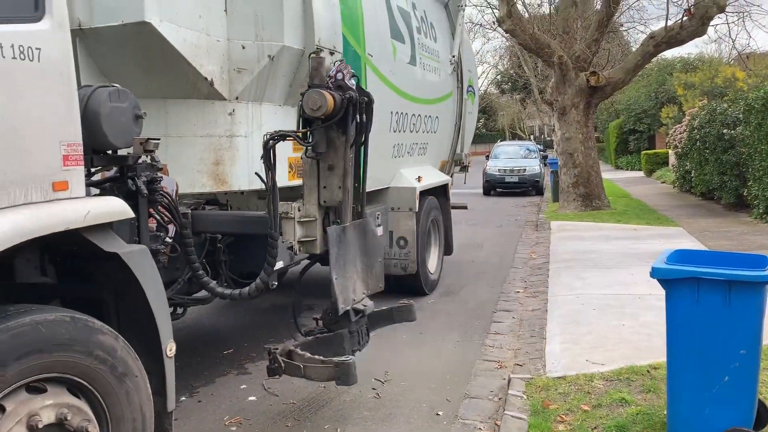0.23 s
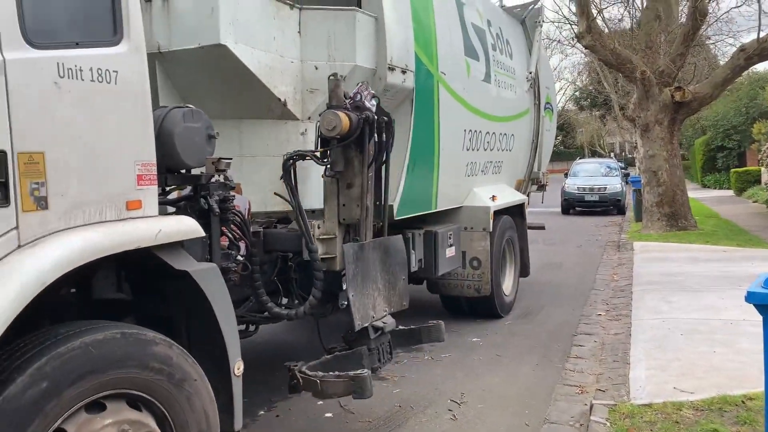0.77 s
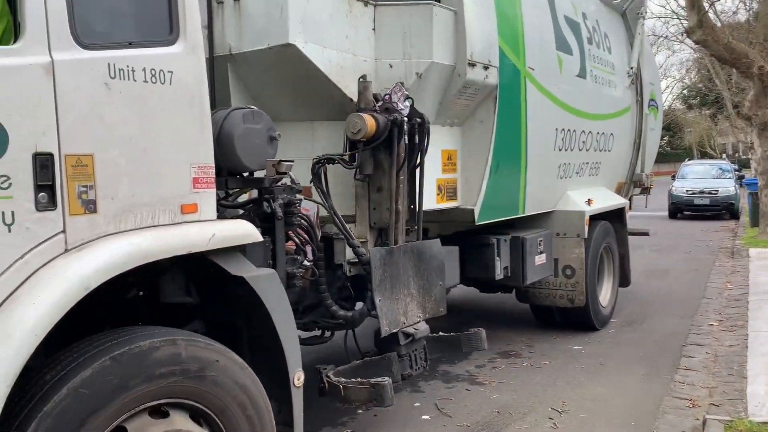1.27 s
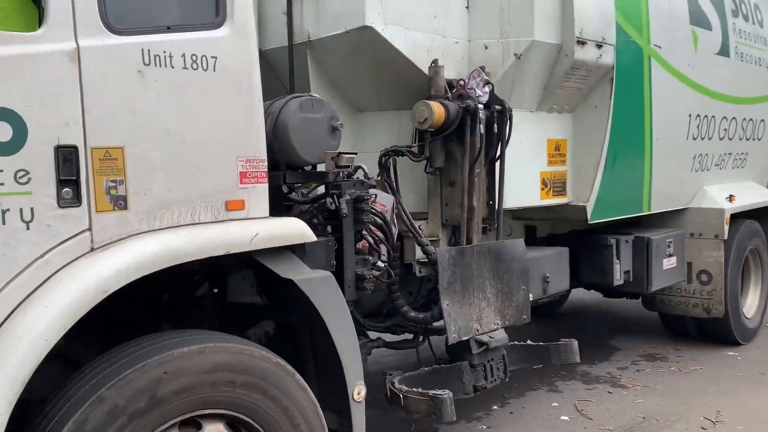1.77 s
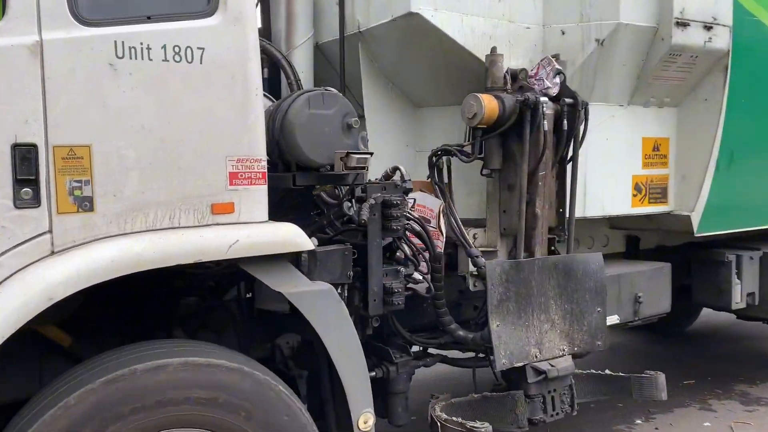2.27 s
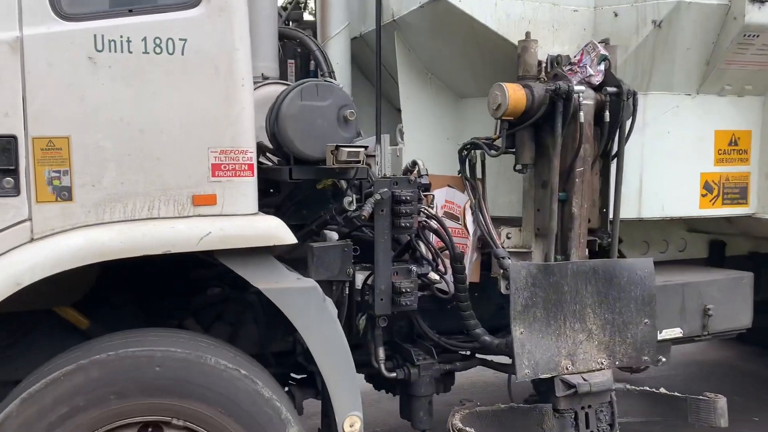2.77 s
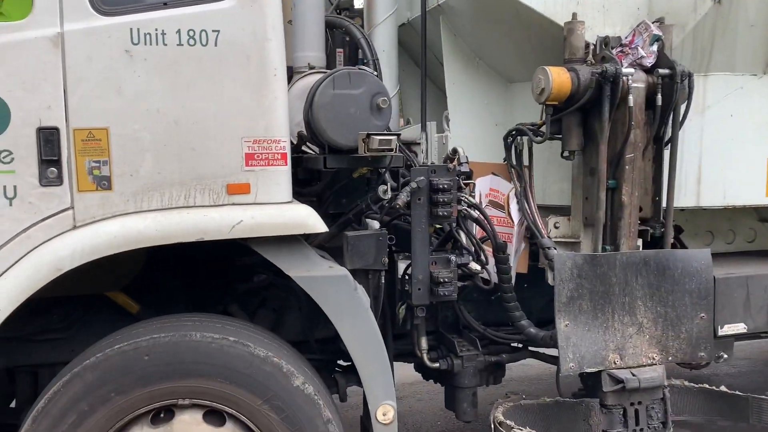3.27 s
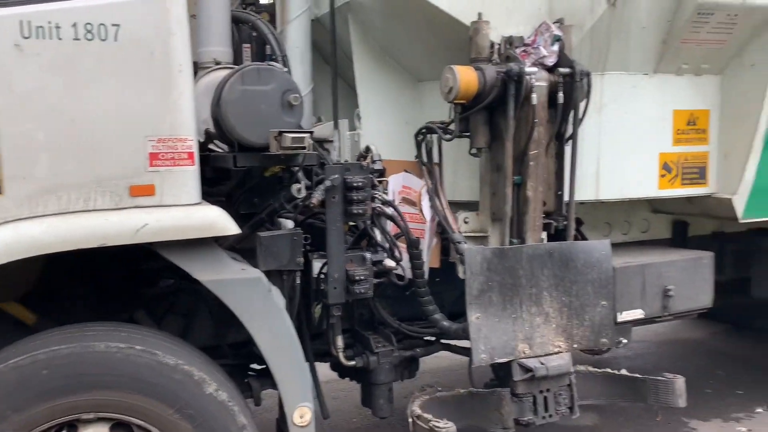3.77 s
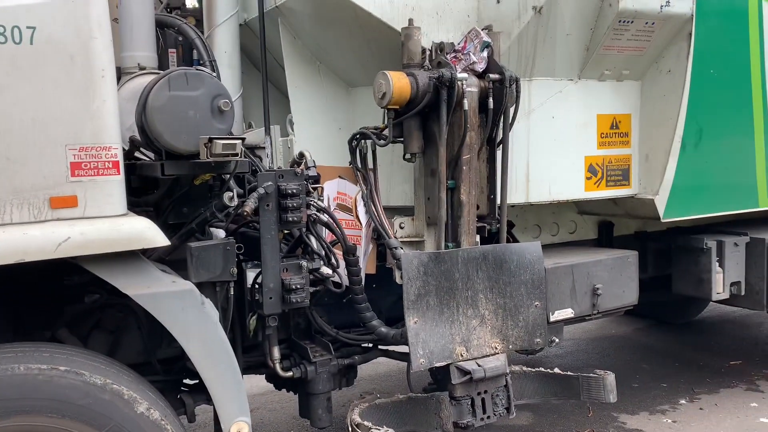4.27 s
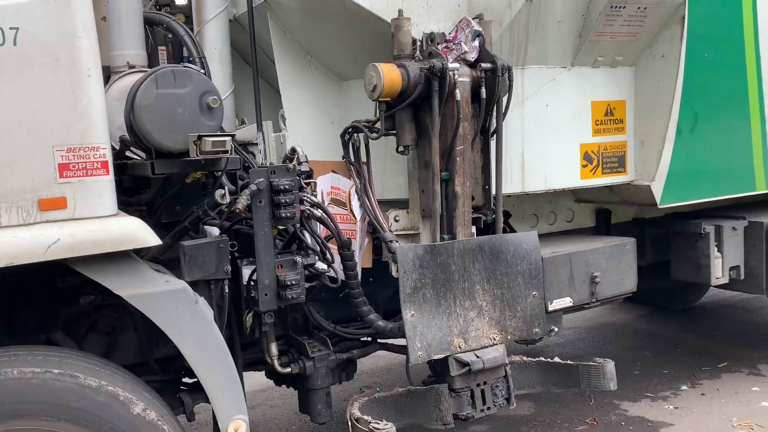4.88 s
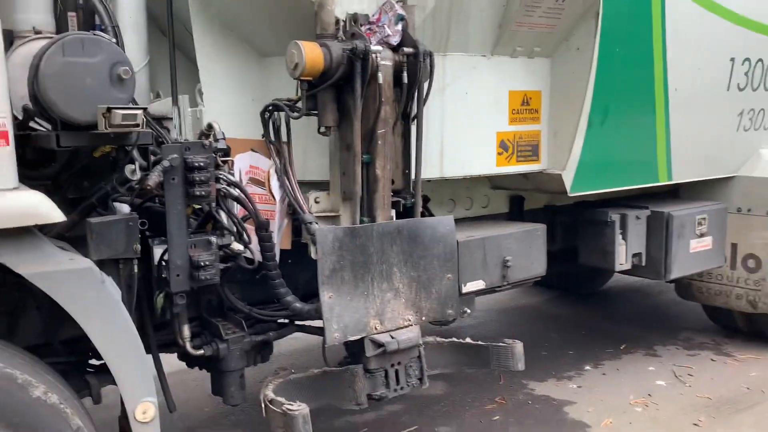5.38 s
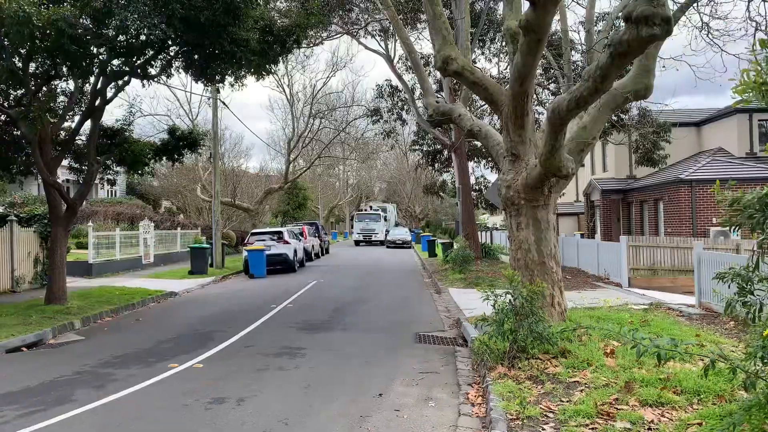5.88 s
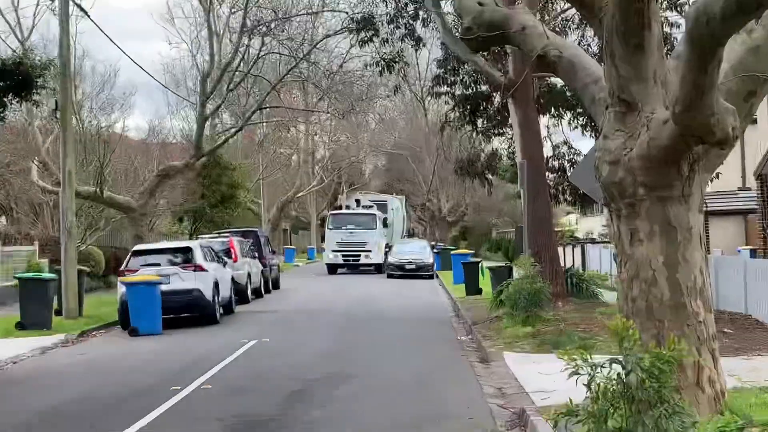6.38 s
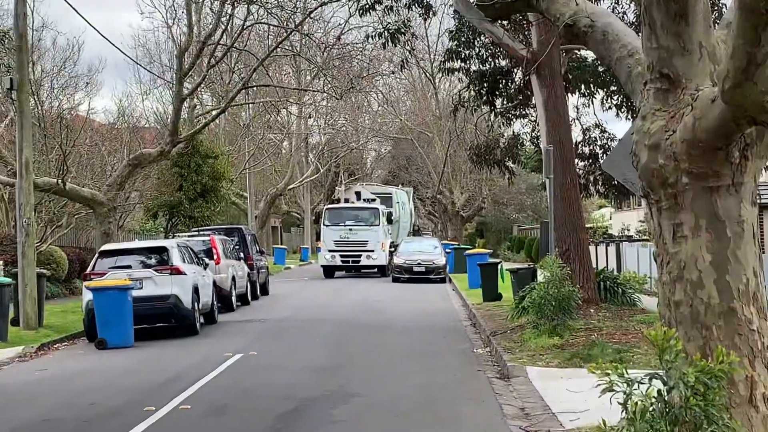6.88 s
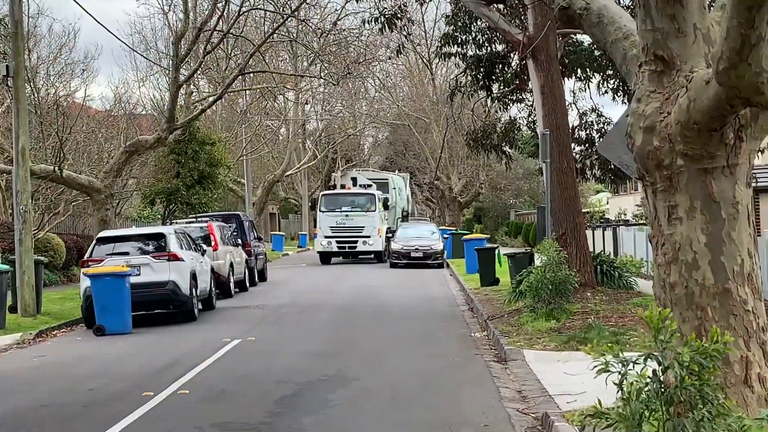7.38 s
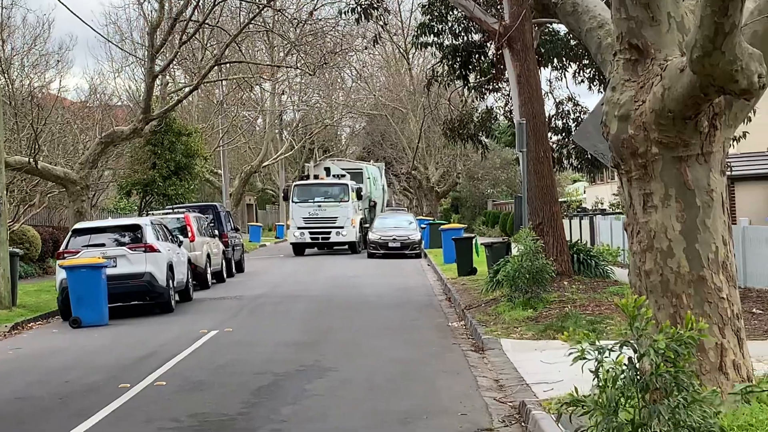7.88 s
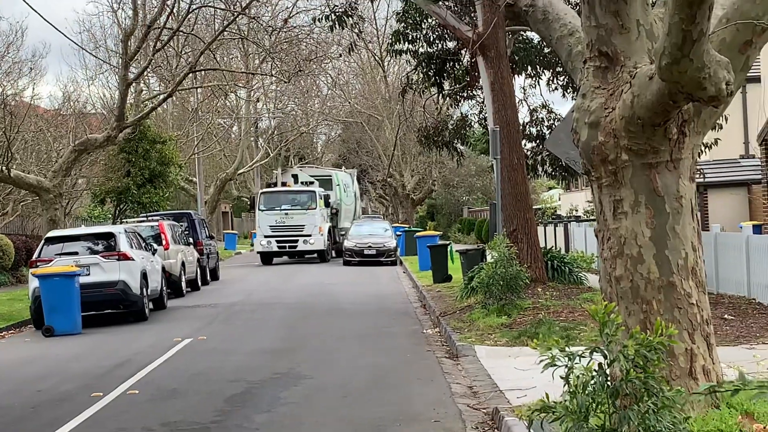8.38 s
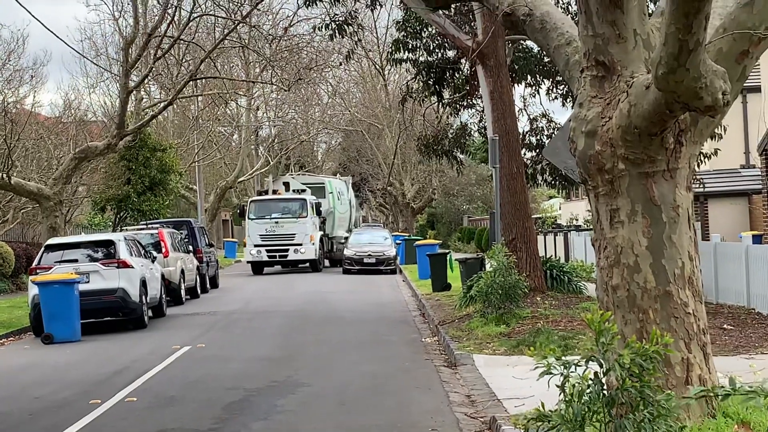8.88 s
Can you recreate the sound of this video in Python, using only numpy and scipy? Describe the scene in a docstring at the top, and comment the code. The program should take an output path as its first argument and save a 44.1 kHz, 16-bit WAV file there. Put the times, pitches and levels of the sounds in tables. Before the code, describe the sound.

A garbage truck's diesel engine rumbles and clatters close by on a suburban street. Its lifting arm clunks and rattles over a hydraulic hum, then the brakes give a very high, fluttering squeal, followed by a sharp blast of air. The sound cuts to a second truck far down the street, which idles, revs up, eases off and clunks dully. Heard in stereo with short street echoes.

```python
"""A garbage truck idles close by, rumbling and clattering as its cylinders fire. Its lifting arm clunks home,
ringing the steel, while the hydraulic pump hums. Then the brakes stick and slip in a squeal and blow
off a jet of air, and the engine noise dips under them. The scene switches to a second truck far down
the street, which idles, pulls away, eases off and clunks. Two closely spaced microphones hear it all."""
import sys
import numpy as np
from scipy import signal
from scipy.fft import rfft, irfft, next_fast_len
from scipy.io import wavfile
from scipy.ndimage import uniform_filter1d, map_coordinates

SR = 44100
rng = np.random.default_rng(int(sys.argv[2]) if len(sys.argv) > 2 else 0)


def wrap_up_sound(samples):
    """Save the sound to the file named by the first command line argument, as 16-bit audio."""
    columns = np.atleast_2d(samples).T
    # keep every value between -1 and 1, then stretch to whole-number steps
    tamed = np.clip(columns, -1, 1)
    steps = np.round(tamed * 32767).astype(np.int16)
    wavfile.write(sys.argv[1], SR, steps)


N = 402191
TIME = np.arange(N) / SR
SWITCH_S = 5.627  # the far truck takes over

# air releases, near truck then far: (valve opens [s], level [dB], stays open [s])
AIR_RELEASES = [(4.352, -12, 0.43), (6.765, -56, 0.12)]


def near_truck(clunks):
    """The close truck: engine, arm, pump and brakes, with short street echoes."""
    speed = [(0, 41.7), (.5, 41.5), (1.45, 41.6), (1.8, 43.8), (2.08, 45.1), (2.45, 44.4), (2.6, 43.4),
             (4.1, 42.7), (4.9, 42.4), (5.5, 42.8)]  # (time [s], firings [1/s])
    levels = [(0, -30.5, -30.5, -29.5), (.5, -30.5, -29.5, -30), (1.1, -27.5, -30.5, -27.5),
              (1.5, -27, -28.5, -29), (1.8, -27, -28.5, -29), (2.08, -27.5, -28.5, -26),
              (2.3, -26, -27.5, -31), (2.5, -28.5, -28.5, -28), (2.53, -30, -33, -31.5),
              (2.8, -31, -32, -33), (2.96, -35, -37.5, -34.5), (3.25, -34, -33.5, -33.5),
              (3.72, -31, -33.5, -30), (3.79, -27, -29.5, -30), (4.35, -29.5, -30, -28.5),
              (4.41, -39, -39.5, -41.5), (4.55, -40, -43.5, -46), (4.82, -43, -43.5, -38),
              (4.93, -35, -36, -39), (5.4, -34, -35.5, -38.5), (5.55, -33.5, -33.5, -36)]  # (time [s], rumble [dB], clatter [dB], exhaust [dB])
    pipe = [(41, -0.5), (44, -1), (83, -5), (88, 2.5), (125, -10.5), (133, -6), (208, -4.5), (220, -24)]  # exhaust pipe: (frequency [Hz], gain [dB])
    body = [(60, 4.5), (130, 1), (250, -1.5), (450, -4.5), (620, -8.5), (800, -13.5), (1150, -11.5),
            (1450, -13.5), (2200, -13.5), (3200, -19.5), (5200, -26), (7500, -36), (10000, -25),
            (15500, -25.5)]  # engine noise: (frequency [Hz], level [dB])
    rings = [(593, 92.4, 2.5), (1108, 136, -5), (4230, 230, 1), (6200, 83, 10.5), (6720, 450, 14)]  # ringing block and covers: (pitch [Hz], width [Hz], strength [dB])
    hiss_dip = [(2.26, -0.3), (2.32, -2), (2.9, -10), (3.1, -4), (3.33, -0.7)]  # the hiss thins during the squeal: (time [s], gain [dB])
    gears = [(0, -27, -13.5, -23.5), (.45, -6.5, -24, -19), (1.5, -3.5, -14, -15), (1.95, -22, -9.5, -14),
             (2.1, -3, -8, -13), (2.5, -6, -9, -18), (2.8, -3, -15, -10), (3.5, -3, -15.5, -8.5),
             (4.15, -3, -17, -11.5), (4.5, -6, -20, -19), (5, -5, -14, -15), (5.62, -7, -13.5, -20)]  # gear whine: (time [s], harmonics 1, 2, 3 [dB over clatter])
    plate = [(0, 4180, -9.5), (.45, 4150, -13), (.7, 4220, -23), (.86, 4240, -18), (.92, 4190, -5.5),
             (1.04, 4240, -6.5), (1.18, 4200, -9.5), (1.26, 4200, -18), (1.45, 4116, -24.5), (2, 4150, -37),
             (2.7, 4208, -18.5), (3, 4190, -27.5), (3.9, 4180, -11.5), (4.5, 4136, -26), (5.2, 4120, -12.5),
             (5.6, 4132, -11)]  # cover plate: (time [s], pitch [Hz], level [dB over clatter])
    alike = [(60, 2.5), (200, 0.6), (400, 0.85), (900, 0.23), (1500, 0.5), (3000, 0.05), (5000, 0.11),
             (6500, 0.53), (8000, 1.2), (16000, 1.86)]  # (frequency [Hz], left-right likeness [capped at 1])
    lead = [(700, -0.1), (1100, -0.37), (2000, -1.75), (3200, -1.4), (4200, 0.2), (5300, 1.2),
            (6100, -0.07)]  # (frequency [Hz], right ahead of left [rad])
    side = [(60, 1.5), (300, 4), (550, 6), (1000, 1.5), (3500, 1), (5500, -3.5), (7500, 0)]  # (frequency [Hz], left minus right [dB])
    cycles, clatter_db, sound = engine(
        curves(speed) + curves(levels), pipe, body, rings,
        burst_depth=0.46, hiss_db=-42.5 + curves(hiss_dip)[0], hiss_growth=0.56, waver_db=2.2)
    sound += gear_whine(cycles, clatter_db, gears, roughness=0.4)
    sound += cover_ring(cycles, clatter_db, plate, flicker_db=1.5, smear_hz=14.6)
    sound += clunks + pump_hum(cycles) + brake_squeal() + air_release(*AIR_RELEASES[0])
    return stereo(sound * (TIME < SWITCH_S), alike, lead, side, echo_s=0.069)


def far_truck(clunks):
    """The distant truck revs up and eases off; distance dulls its clunks."""
    # engine: (time [s], firings [1/s], rumble [dB], clatter [dB], exhaust [dB])
    driving = [(5.64, 42, -40.5, -45, -36.5), (5.8, 42.74, -39.5, -44.5, -35), (6.5, 41.8, -39, -44, -35.5),
               (7.19, 42, -38.5, -44, -35), (7.27, 43, -34.5, -40.5, -29), (7.44, 47, -35, -40, -34),
               (7.57, 54, -34, -39.5, -23), (7.7, 57, -32, -40, -19), (7.9, 66, -30, -40, -21.5),
               (8.05, 65.6, -30, -38, -18), (8.18, 69, -28, -38.5, -21), (8.45, 73.3, -29.5, -38, -15.5),
               (8.52, 71, -33, -40.5, -18), (8.56, 69, -28.5, -41, -27), (8.63, 65.2, -33.5, -42, -20),
               (8.68, 63.4, -35.5, -43.5, -33), (8.83, 54, -33, -43, -34), (8.9, 50.5, -34.5, -42, -32),
               (8.97, 57, -30, -37.5, -26), (9.12, 67, -33, -40, -18)]
    pipe = [(43, 0), (70, -1.5), (87, 0), (105, -9.5), (130, -26), (190, -25), (212, -5.5), (235, -19),
            (290, -19.5), (360, -30)]  # exhaust pipe: (frequency [Hz], gain [dB])
    body = [(60, 1.5), (130, -14.5), (250, -15.5), (400, -14), (520, -18), (600, -20.5), (750, -25.5),
            (1000, -18), (1400, -28.5), (2500, -30.5), (4000, -32), (5200, -41.5), (6500, -42.5),
            (8000, -45.5), (10500, -56), (12500, -62), (14000, -74)]  # engine noise: (frequency [Hz], level [dB])
    rings = [(327, 200, 1), (896, 26, -3), (1643, 65, 2.5), (6330, 200, 4.5)]  # ringing block and covers: (pitch [Hz], width [Hz], strength [dB])
    gears = [(5.64, -30, -28, -29.5), (7.5, -17.5, -24.5, -26), (7.9, -14, -18.5, -35), (8.15, -1, -7, -31),
             (8.4, -13, -10, -24), (8.56, -1.5, -10, -25), (8.62, -26.5, -27.5, -26.5)]  # gear whine: (time [s], harmonics 1, 2, 3 [dB over clatter])
    plate = [(5.64, 3580, -18.5), (5.82, 3530, -8), (5.95, 3600, -28), (6.04, 3610, -20), (6.08, 3650, -11),
             (6.12, 3630, -20), (6.2, 3660, -25), (6.3, 3610, -19), (6.5, 3620, -21), (6.6, 3620, -8.5),
             (6.7, 3610, -21.5), (7.15, 3610, -26.5), (7.27, 3590, -15), (7.45, 3586, -27)]  # cover plate: (time [s], pitch [Hz], level [dB over clatter])
    alike = [(60, 0.98), (400, 0.97), (1200, 0.67), (2500, 0.78), (4500, 0.84), (5500, 0.29), (6500, 0.78),
             (8000, 1), (16000, 1)]  # (frequency [Hz], left-right likeness [0 to 1])
    lead = [(600, -0.1), (1000, -0.5), (2600, -1.2), (4300, -1.5), (5300, -1.3), (6100, -0.1)]  # (frequency [Hz], right ahead of left [rad])
    side = [(60, 1), (450, 1.9), (800, -1), (2800, 1), (5500, -4), (7000, -0.7)]  # (frequency [Hz], left minus right [dB])
    cycles, clatter_db, sound = engine(
        curves(driving), pipe, body, rings,
        burst_depth=0.35, hiss_db=-53.0, hiss_growth=3.3, waver_db=0.7)
    sound += gear_whine(cycles, clatter_db, gears, roughness=1.5)
    sound += cover_ring(cycles, clatter_db, plate, flicker_db=3.0, smear_hz=49.6)
    sound += filtered(clunks, lambda hz: 1 / (1 + 1j * hz / 3460) ** 2)
    sound += turbo() + air_release(*AIR_RELEASES[1])
    return stereo(sound, alike, lead, side, echo_s=0.19)


def engine(controls, pipe, body, rings, burst_depth, hiss_db, hiss_growth, waver_db):
    """Six cylinders fire in turn: the exhaust hums, and knocks and noise bursts ring the block."""
    rate, rumble_db, clatter_db, exhaust_db = controls
    cycles = np.cumsum(rate) / SR  # goes up by one at each firing
    exhaust = sum(amp(exhaust_db + along(pipe, k * rate) + waver_db * wobble(9))
                  * np.sin(2 * np.pi * k * cycles + 0.262 * k * wobble(5)) for k in (1, 2, 3, 5))
    firing, progress = cycles.astype(int), cycles % 1
    cylinder_db = rng.normal(0, 1.6, 6)[firing % 6]
    strength = amp(cylinder_db + 2.5 * rng.uniform(-1.56, 1.5, firing[-1] + 1)[firing])
    bursts = 1 + 15 * burst_depth * strength * progress * np.exp(-progress / 0.2276)
    knocks = np.diff(firing, prepend=0) * strength
    noise = patchy_noise(depth_db=1.5)
    drive = unit(bursts * noise) + 0.24 * unit(knocks)

    def block(f):
        ringing = sum(amp(db) * 1j * f * width / (hz * hz - f * f + 1j * f * width)
                      for hz, width, db in rings)
        return amp(along(body, f)) * above(f, 62) * (1 + ringing)

    rumble = unit(filtered(drive, lambda f: block(f) * (1 - above(f, 720))))
    rumble *= amp(rumble_db + 1.05 * wobble(4.8))
    clatter = unit(filtered(drive, lambda f: block(f) * above(f, 720) * (1 - above(f, 6300))))
    hiss = unit(filtered(noise, lambda f: block(f) * above(f, 6300)))
    hiss *= amp(hiss_db + hiss_growth * (clatter_db - clatter_db.max()))
    return cycles, clatter_db, exhaust + rumble + amp(clatter_db) * clatter + hiss


def steel_clunks():
    """Each blow on the arm or body rings the steel and sets loose parts rattling."""
    blows = [(0.145, -17, -4, 3, 8.5), (0.184, -19, -2, 2, 5.5), (0.2, -21.5, 4, -2, 7),
             (0.275, -11.5, -8, -6, 1), (0.324, -19, -4, 5.5, 4), (0.388, -14.5, -6, -2, -8),
             (0.4, -23, -3, 8, 3), (1.453, -5.5, -6, 4.5, 0.5), (1.471, -8, 0.5, -2.5, -10),
             (1.489, -8.5, 0.1, 4, -7.5), (1.504, -13.5, -4, 3, -2), (1.522, -17, 4, -13, -11),
             (1.883, -18.5, 5.5, -3, -5.5), (2.477, -27.5, 0.1, -4, 0), (2.609, -22, -3, 6.5, 2),
             (6.468, -33, 10, -24, -25.5), (7.291, -27, -9, -19.5, -19.5),
             (7.306, -25.5, -17, -19.5, -19.5), (7.39, -38, -5.5, 19, 6), (7.426, -32.5, -5, 13.5, 2),
             (7.545, -33.5, -7, -6, -14), (8.53, -34, -2, 12, 0), (8.93, -15, -15, -6, -10.5),
             (8.95, -19, -16, -11, -7), (8.972, -22, -12, -5, -3)]  # (time [s], level [dB], boom [dB], ringing treble [dB], crack [dB])
    colour = [(60, -3), (120, -4), (200, 1.5), (450, -2), (800, -10), (1100, -12), (2000, -15),
              (3500, -20.5), (6000, -27), (10000, -31), (15500, -33)]  # rattle noise: (frequency [Hz], level [dB])
    steel = [(183.7, 0, 0.566), (296, -3, 0.24), (362.6, -2.5, 0.2), (453.7, -5, 0.27), (664, -9.5, 0.16),
             (505, -16.5, 0.11), (907, -8, 0.13), (1097, -7, 0.12), (1216, -9.5, 0.13), (1820, -14.5, .1),
             (2083, -20.5, 0.085)]  # ringing notes: (pitch [Hz], level [dB], time to fade 60 dB [s])
    out, t = np.zeros(N + SR), np.arange(SR // 2) / SR
    rise = 1 - np.exp(-t / 0.0012)
    for start, db, boom_db, treble_db, crack_db in blows:
        ring = sum(amp(level + rng.normal(0, 3) + (hz > 800) * treble_db + (hz < 250) * boom_db)
                   * decay(t, fade_s) * np.sin(2 * np.pi * hz * t) for hz, level, fade_s in steel)
        shake = rng.standard_normal((2, len(t)))
        shake *= amp(3 * np.repeat(rng.standard_normal(len(t) // 150), 150))
        dull = unit(filtered(shake[0], lambda f: amp(along(colour, f)) * (1 - above(f, 800))))
        sharp = unit(filtered(shake[1], lambda f: amp(along(colour, f)) * above(f, 750)))
        snap = amp(1) * decay(t, 0.0299)  # the first instant of contact
        rattle = dull * decay(t, 0.23) + sharp * amp(crack_db) * (decay(t, 0.19) + snap)
        out[round(start * SR):][:len(t)] += amp(db) * rise * (amp(-9.5) * ring + amp(-7) * rattle)
    return out[:N]


def brake_squeal():
    """The linings stick and slip, so the brake drums sing rough notes that swell and fade."""
    notes = [(2.23, 13850, -32, .05, .06), (2.29, 9280, -18.5, 0.015, 0.072),
             (2.27, 10300, -39, 0.014, .02), (2.36, 8760, -12.5, .04, 0.044),
             (2.4, 7025, -26, 0.031, 0.022), (2.4, 9304, -16, 0.044, 0.096), (2.41, 8203, -26, .04, .2),
             (2.51, 9265, -10.5, 0.097, 0.037), (2.53, 12500, -33, .04, 0.054),
             (2.57, 11390, -25, 0.032, 0.075), (2.61, 9974, -18, 0.086, 0.16),
             (2.64, 8110, -16.5, 0.079, 0.14), (2.64, 6927, -29, 0.027, 0.12),
             (2.85, 13900, -44, 0.23, .22), (2.82, 6937, -30, 0.093, 0.38),
             (2.83, 8140, -10.5, 0.099, 0.21), (2.87, 10040, -18.5, 0.075, 0.13),
             (2.94, 9200, -35, .06, 0.076), (3.06, 10070, -36.5, 0.1, 0.088), (3.06, 6950, -35, .04, 0.051),
             (3.14, 8205, -24.5, 0.11, .1), (3.24, 8245, -27, 0.045, 0.085), (3.29, 10900, -46, .06, .03),
             (3.08, 12660, -42, 0.12, 0.067), (3.1, 9160, -46, 0.077, 0.22), (3.2, 11930, -33.5, 0.5, 0.15),
             (3.28, 11650, -24.5, 0.11, 0.048)]  # (peak time [s], pitch [Hz], level [dB], swell [s], fade [s])
    rise_hz_per_s = 160  # pitch creeps up as the wheel slows
    out, flutter, drift = np.zeros(N), wobble(70), wobble(120)
    for k, (peak_s, hz, db, swell, fade) in enumerate(notes):
        span = slice(round((peak_s - 2 * swell) * SR), round((peak_s + 2 * fade) * SR))
        t = TIME[span] - peak_s
        shape_db = -21 * np.abs(t / np.where(t < 0, swell, fade)) ** 1.62
        shift = -7000 * k  # each note wavers in its own way
        pitch = hz + rise_hz_per_s * t + 12 * np.roll(drift, shift)[span]
        out[span] += amp(db + shape_db + 2.3 * np.roll(flutter, shift)[span]) * tone(pitch)
    return out


def air_release(start, db, open_s):
    """Air rushes from the brake valve: a thin leak, a pop and burst, then a sagging jet that shuts off."""
    colour = [(1000, -18.5), (1500, -10), (2200, -8.5), (2800, -12.5), (3500, -3.5), (5000, -1), (7000, 0),
              (9000, -2), (12000, 1.5), (15500, -0.5)]  # jet noise: (frequency [Hz], level [dB])
    t = TIME - start
    since_open = np.maximum(t, 0)
    jet = unit(filtered(rng.standard_normal(N), lambda f: amp(along(colour, f)) * above(f, 800)))
    opening_db = np.interp(t, [-.15, -.12, -.012, .006, .067], [-70, -22, -22, 0, -5.5])
    closing_db = 20 * since_open + 57 * np.maximum(t - open_s, 0)
    pop = unit(filtered(rng.standard_normal(N), lambda f: above(f, 900) * (1 - above(f, 5500))))
    pop *= (t > 0) * amp(db - 11) * decay(since_open, .12)
    return pop + (t > -.15) * amp(db + opening_db - closing_db + 0.91 * wobble(40)) * jet


def pump_hum(cycles):
    """The pistons of the engine-driven pump pulse into a hum while the arm moves."""
    load = [(.2, -48), (.4, -29.5), (.6, -31.5), (.8, -30.5), (1, -32.5), (1.2, -29), (1.44, -30.5),
            (1.58, -36), (1.7, -27.5), (1.9, -38.5), (2.05, -60)]  # hydraulic load: (time [s], level [dB])
    partials = [(.5, -7), (1, 2), (1.5, -7), (2.5, -9.5)]  # hum tones: (multiple of the pulse rate, gain [dB])
    pulses_per_firing = 20 / 3
    phase = 2 * np.pi * pulses_per_firing * cycles
    return sum(amp(curves(load)[0] + db + 3.2 * wobble(9.66)) * np.sin(k * phase + 0.49 * wobble(13))
               for k, db in partials)


def gear_whine(cycles, clatter_db, rows, roughness):
    """The timing gears whine unsteadily as 13 teeth meet for each firing."""
    phase = 2 * np.pi * 13 * cycles
    return sum(amp(clatter_db + db + 2.52 * wobble(14))
               * np.sin((k + 1) * phase + roughness * (1 + 0.38 * k) * wobble(25))
               for k, db in enumerate(curves(rows)))


def cover_ring(cycles, clatter_db, rows, flicker_db, smear_hz):
    """A cover plate on the engine rings with a thin tone that swells and dies once a firing."""
    hz, db = curves(rows)
    pulse = np.cos(np.pi * (cycles - .67)) ** 4  # peaks .67 of a cycle after the firing
    gain = amp(clatter_db + db + flicker_db * wobble(30))
    return gain * unit(pulse * tone(hz + smear_hz * wobble(90)))


def turbo():
    """The turbocharger's whistle, smeared into a narrow hiss, rises with boost."""
    whistle = [(7.3, 4350, -65), (7.5, 4410, -50), (7.75, 4570, -50), (8.1, 4590, -47), (8.45, 4633, -48.5),
               (8.65, 4474, -70)]  # (time [s], pitch [Hz], level [dB])
    hz, db = curves(whistle)
    return amp(db + 1.6 * wobble(90)) * tone(hz + 170.6 * wobble(400))


def stereo(sound, alike, lead, side, echo_s):
    """Direct sound plus street echoes, then each microphone's own level and delay."""
    t = np.arange(SR // 4) / SR
    tails = rng.standard_normal((5, len(t))) * decay(t, echo_s)
    # five echo patterns take turns: the echoes change as things move
    share = lambda k: np.cos(np.pi / 2 * np.clip((5 * TIME - k) % 5 - 2, -1, 1))
    echo = sum(signal.fftconvolve(sound * share(k), tail / np.linalg.norm(tail))[:N]
               for k, tail in enumerate(tails))
    blend = lambda hz: np.arccos(np.clip(along(alike, hz), 0, 1)) / 2
    middle = filtered(sound, lambda hz: np.cos(blend(hz)))
    spread = filtered(echo, lambda hz: np.sin(blend(hz)))
    sign = np.array([[1], [-1]])  # left, right
    left_treble_lag_s = 0.000213

    def microphones(hz):
        phase = np.interp(hz, *np.transpose([(0, 0), *lead]))
        phase += 2 * np.pi * left_treble_lag_s * np.maximum(hz - lead[-1][0], 0)
        return amp(sign * along(side, hz) / 2) * np.exp(-.5j * sign * phase)

    return filtered(middle + sign * spread, microphones)


def patchy_noise(depth_db):
    """Noise with louder and softer patches across pitch and time."""
    spectrum = signal.stft(rng.standard_normal(N), nperseg=512)[2]
    patches = uniform_filter1d(rng.standard_normal(spectrum.shape), size=4, axis=0)
    patches = uniform_filter1d(patches, size=10, axis=1)
    return signal.istft(spectrum * amp(depth_db * unit(patches)), nperseg=512)[1][:N]


def amp(db):
    """Turn dB into gain."""
    return 10 ** (np.asarray(db) / 20)


def decay(t, fade_s):
    """A gain that falls 60 dB in fade_s."""
    return amp(-60 * t / fade_s)


def tone(hz):
    """A sine wave that follows a changing pitch."""
    return np.sin(2 * np.pi * np.cumsum(hz) / SR)


def unit(x):
    """Scale to an average power of 1."""
    return x / np.sqrt(np.mean(x ** 2) + 1e-20)


def along(points, hz):
    """Read between (frequency, value) points on a log frequency scale."""
    f, values = np.transpose(points)
    return np.interp(np.log(hz + 1), np.log(f + 1), values)


def curves(rows):
    """One value per sample for each column after the time."""
    times, *columns = np.transpose(rows)
    return [np.interp(TIME, times, column) for column in columns]


def wobble(rate):
    """A smooth curve through `rate` random points a second."""
    return map_coordinates(rng.standard_normal(int(N * rate / SR) + 4), [TIME * rate])


def filtered(x, response):
    """Change each frequency's level and phase by response(hz)."""
    size = next_fast_len(x.shape[-1] + SR // 4)
    return irfft(rfft(x, size) * response(np.fft.rfftfreq(size, 1 / SR)), size)[..., :x.shape[-1]]


def above(hz, edge_hz):
    """A smooth step from 0 below the edge to 1 above it."""
    return 1 / (1 + (edge_hz / (hz + 1)) ** 6)


def scene():
    """The near truck's sound stops at once and the far truck's fades quickly in."""
    clunks = steel_clunks()
    fade_in = np.interp(TIME - SWITCH_S, [0, 0.0009, 0.0091], [0, .05, 1])
    return near_truck(clunks) * (TIME < SWITCH_S) + far_truck(clunks) * fade_in


def record(dry):
    """Drop the deepest bass and the very highest treble."""
    return filtered(dry, lambda hz: above(hz, 31.5) * (hz < 15950))


dry = scene()
out = record(dry)
wrap_up_sound(out)
```